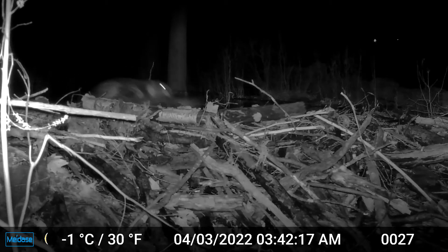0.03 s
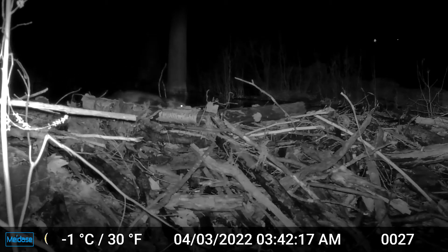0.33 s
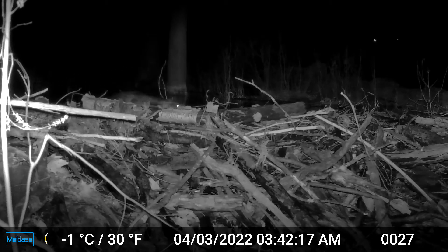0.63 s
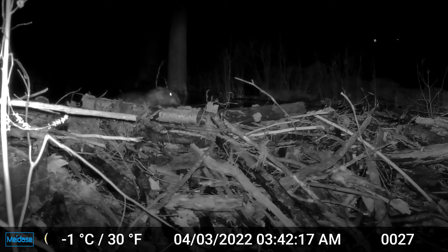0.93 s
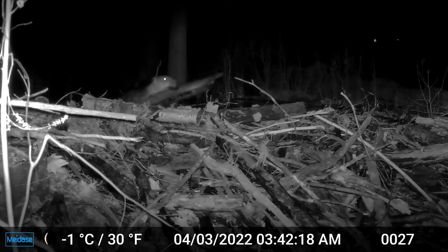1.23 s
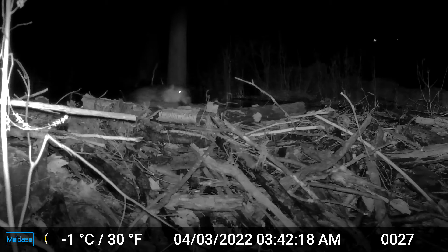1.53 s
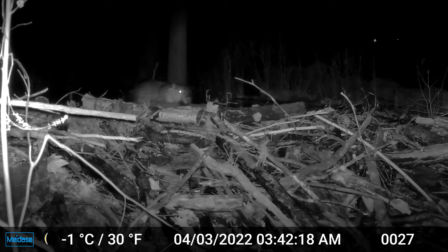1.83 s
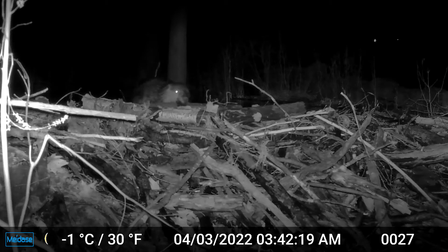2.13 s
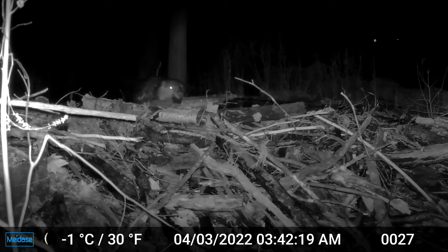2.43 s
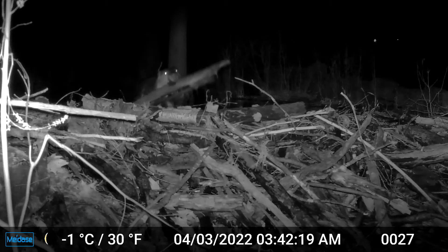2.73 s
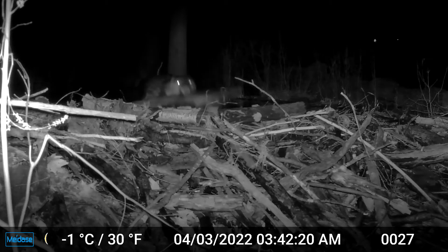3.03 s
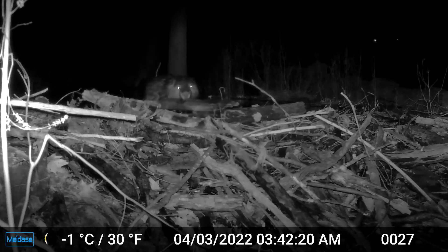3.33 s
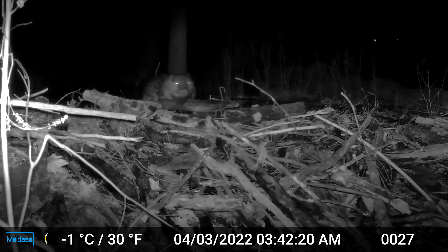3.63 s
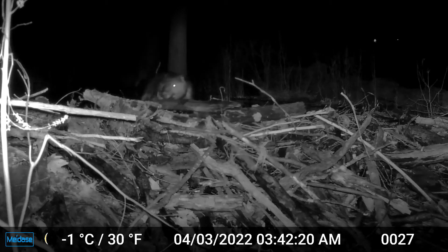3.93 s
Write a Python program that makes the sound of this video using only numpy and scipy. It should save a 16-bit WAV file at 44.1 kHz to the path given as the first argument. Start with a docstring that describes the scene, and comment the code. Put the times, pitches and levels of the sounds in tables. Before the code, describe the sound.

Close splashes and wet wooden slaps come as a beaver heaves a log at its dam. Drops plink after a loud plunge and a softer one; a soft whine and frog peeps echo farther off before the third plunge.

```python
"""A pond at night, one microphone near a beaver's dam of sticks. The beaver heaves a log over it: at 0.3 s
wet wood slaps and the log drops in with a thud and a splash. Drops plink, a frog peeps from the trees
and the water gulps shut. A softer plunge comes at 1.6 s; at 2.3 s the beaver whines once among more
peeps, both echoing in the woods. At 3.2 s the log plunges a third time and water dribbles off it.
A faint trickle, a far frog chorus and a low rumble lie under it all."""
import sys
import numpy as np
from scipy import signal
from scipy.fft import rfft, irfft, next_fast_len
from scipy.io import wavfile

SR = 44100
rng = np.random.default_rng(int(sys.argv[2]) if len(sys.argv) > 2 else 0)


def transcribe(signal):
    """Save signal, clipped to [-1, 1], as a 16-bit WAV file at the path in sys.argv[1]."""
    frames = np.atleast_2d(signal).T
    limited = np.clip(frames, -1, 1)
    pcm = np.round(limited * 32767).astype(np.int16)
    wavfile.write(sys.argv[1], SR, pcm)


N = 176400
T = np.arange(N) / SR
SHORT = T[:SR // 4]

# Wet wood slapping at the dam, close by: t/s, level/dB, ring f/Hz, tilt/(dB per octave)
WOOD_SLAPS = [(0.177, -20.5, 4740, 1.5), (0.1831, -23.5, 5100, 5.5), (0.189, -25.5, 3980, 3),
              (0.2882, -7, 4400, -3), (0.2896, -7.5, 3750, 17), (0.3016, -15, 2640, 1),
              (0.3273, -15, 1500, 0.5), (0.3675, -18, 1330, -15.5), (0.4193, -11.5, 2780, -10),
              (0.4864, -21.5, 2610, -4.5), (0.5571, -22, 4800, -6), (0.569, -22.5, 1497, -7.5),
              (1.368, -28, 4950, -4), (1.4487, -23, 3870, -9.5), (1.457, -22.5, 4570, 19),
              (1.4972, -25, 2280, 2.5), (1.5355, -26, 2640, -1.5), (1.593, -27, 5960, -4),
              (1.6036, -21, 3620, -1.5), (1.6069, -17.5, 2170, 0), (1.635, -25, 4540, 4),
              (1.6713, -20, 2940, -2.5), (1.697, -29.5, 4600, 2), (3.0959, -24.5, 4370, 5),
              (3.106, -18.5, 1940, -2), (3.2175, -27.5, 4900, 15.5), (3.235, -19.5, 4830, 7.5),
              (3.246, -14, 2590, -1.5), (3.261, -20, 4400, 7), (3.298, -11, 3090, 12),
              (3.3184, -24.5, 5430, -0.5), (3.3196, -18, 6100, 4), (3.3423, -16.5, 2890, 3),
              (3.352, -21.5, 2930, -5.5), (3.3703, -19.5, 2840, 0.5), (3.4, -21.5, 3020, -3),
              (3.455, -20, 1560, -0.5), (3.8469, -25, 2640, 0)]
# Spectrum of a slap: f/Hz, level/dB
SLAP_SPECTRUM = [(90, -27), (700, -19), (1300, 5), (2800, 3.5), (4500, 4.5), (6700, 0.5), (7800, -18),
                 (9000, -37)]
def slaps(lead_s=.01, attack_s=.001405, snap_t60=.0078, tail_t60=.075, ring_db=11):
    """Each contact swells quickly to a crackling snap with one resonance, then leaves a wet tail."""
    out = np.zeros(N)
    after = np.maximum(SHORT - lead_s, 0)
    attack = np.exp(np.minimum(SHORT - lead_s, 0) / attack_s)
    shape = attack * (fade(after, snap_t60) + from_db(-9) * fade(after, tail_t60))
    grit = rng.standard_normal(N) * from_db(3 * noise_band(350, .89))
    for s, db, hz, tilt_db in WOOD_SLAPS:
        def spectrum(f):
            tilt = tilt_db * np.log2(np.maximum(f, hz / 2) / hz)
            return curve(SLAP_SPECTRUM)(f) + tilt + ring_db * bell(f, hz, octaves=.12)
        burst = np.roll(grit, -int(s * SR))[:len(SHORT)] * shape
        crack = colour(burst, spectrum)
        crack *= np.linalg.norm(shape) / np.linalg.norm(crack)
        add(out, s - lead_s + attack_s, from_db(db - 6) * crack)
    return out


# The log's weight landing: t/s, level/dB, f/Hz
LOG_THUDS = [(0.285, -26.5, 90.4), (1.538, -35, 79), (3.238, -24, 87.5)]
# Its dull knocks: t/s, level/dB
LOG_KNOCKS = [(0.2868, -19), (0.351, -27.5), (2.223, -43), (3.107, -39), (3.216, -37.5), (3.244, -42),
              (3.821, -41.5)]
# Modes of the wet log: f/Hz, level/dB, t60/s
WET_LOG_MODES = [(254, -13, 0.11), (426, -3, 0.02), (618, 0, 0.034), (1110, -8.5, 0.072), (1277, 0, 0.036),
                 (1560, -14.5, 0.039)]
def log_blows(thud_t60=.068):
    """The log's weight lands with low thuds, and knocks ring its damped modes."""
    out = np.zeros(N)
    for s, db, hz in LOG_THUDS:
        add(out, s, from_db(db) * np.sin(2 * np.pi * hz * SHORT) * fade(SHORT, thud_t60))
    for s, db in LOG_KNOCKS:
        for k, (hz, mode_db, t60) in enumerate(WET_LOG_MODES):
            mode = np.sin(2 * np.pi * hz * SHORT) * fade(SHORT, t60)
            add(out, s, (-1) ** k * from_db(db + mode_db + rng.normal(0, .67)) * mode)
    return out


# Spray thrown up in front of the microphone: t/s, level/dB
SPRAY_LEVELS = [(0, -37.5), (.05, -40), (.08, -48.5), (.185, -47.5), (.27, -39), (.295, -36), (.335, -33),
                (.425, -34.5), (.465, -39.5), (.53, -57.5), (.62, -52.5), (.72, -76.5), (1.42, -56.5),
                (1.47, -69), (1.575, -43), (1.6, -38.5), (1.69, -36.5), (1.715, -57), (1.84, -64.5),
                (3.08, -66.5), (3.2, -52), (3.245, -34.5), (3.29, -38.5), (3.38, -41.5), (3.47, -44),
                (3.55, -55.5), (3.64, -60), (4, -75)]
# Churning under the plunging log: t/s, length/s, level/dB
LOG_PLUNGES = [(0.275, 0.12, -34), (1.6, 0.041, -44), (3.212, 0.05, -42.5), (3.318, 0.1, -51)]
# Spectra of spray and churning: f/Hz, level/dB
SPRAY_SPECTRUM = [(150, -26), (500, -4), (850, -12.5), (1350, 0.5), (2000, 2), (2800, -1.5), (4500, -0.5),
                  (5500, -5), (6600, -8.5), (7600, -23.5), (9000, -34)]
CHURN_SPECTRUM = [(60, -29.5), (110, -5.5), (170, 1.5), (300, -1), (470, 3), (750, -12.5), (1200, -0.5),
                  (2000, -21), (5000, -47)]
def splashes(attack_s=.0031, release_s=.042, clumps_hz=61):
    """Clumped spray of bursting bubbles and fine mist, with deep churning while the log plunges."""
    grains = from_db(.5) * bubbles(SPRAY_SPECTRUM, per_s=1600, spread_db=3.5, cycles=33.5)
    mist = from_db(-2.5) * noise(SPRAY_SPECTRUM)
    spray_db = np.interp(T, *np.transpose(SPRAY_LEVELS)) + noise_band(clumps_hz)
    churn = np.zeros(N)
    for s, length, db in LOG_PLUNGES:
        attack = np.clip((T - s) / attack_s, 0, 1)
        release = np.exp(-np.maximum(T - s - length, 0) / release_s)
        churn += from_db(db) * attack * release
    return (grains + mist) * from_db(spray_db) + churn * noise(CHURN_SPECTRUM)


def plink(hz, cycles=62, rise_per_s=.67, attack_s=.00081):
    """One bubble rings and rises in pitch."""
    envelope = fade(SHORT, cycles / hz) * (1 - np.exp(-SHORT / attack_s))
    return envelope * sine(hz * (1 + rise_per_s * SHORT))


# Drops on the near water: t/s, level/dB, f/Hz
POND_DROPS = [(0.2312, -21.5, 3620), (.2625, -29.5, 4300), (0.54, -29.5, 1600), (0.5724, -30.5, 1550),
              (0.6395, -28, 2116), (0.6709, -31, 1474), (0.6856, -35.5, 1300), (0.7525, -30.5, 2600),
              (1.0805, -35, 1260), (1.294, -36.5, 1735), (1.7415, -32, 1504), (1.7835, -33.5, 2150),
              (1.811, -35, 1795), (1.9866, -30, 1990), (2.0851, -38.5, 1320), (2.434, -32.5, 2720),
              (2.5739, -27.5, 2510), (2.668, -36.5, 3920), (2.8838, -35.5, 1121), (2.993, -26, 4040),
              (3.6614, -33.5, 1180), (3.71, -33, 1570), (3.723, -30, 1290), (3.7427, -24, 3030),
              (3.7947, -36.5, 1230), (3.8196, -31.5, 1167)]
def drops(splat_t60=.043, attack_s=.00081, cluster_s=.023):
    """Each drop makes a soft splat and a main bubble, then five fainter ones."""
    out = np.zeros(N)
    splat_shape = from_db(-7) * fade(SHORT, splat_t60) * (1 - np.exp(-SHORT / attack_s))
    for s, db, hz in POND_DROPS:
        splat = splat_shape * rms_one(band_pass(rng.standard_normal(len(SHORT)), hz, octaves=.45))
        add(out, s, from_db(db) * (plink(hz) + splat))
        for late, pitch in rng.random((5, 2)):
            octaves = .35 * (2 * pitch - .5)
            add(out, s + late * cluster_s, from_db(db - 17) * plink(hz * 2 ** octaves))
    return out


# Dribbles after each splash: t/s, length/s, level/dB
DRIBBLES = [(0.499, 0.23, -48.5), (1.723, .38, -48.5), (3.475, .39, -50)]
def runoff(count=50, hz=1965, octaves=.6, spread_db=7):
    """Water runs off the log in an irregular string of small bubbles."""
    out = np.zeros(N)
    for s, length, db in DRIBBLES:
        for k in range(count):
            size, pitch = np.clip(rng.standard_normal(2), -2, 2)
            start = s + length * (k + rng.random()) / count
            add(out, start, from_db(db + spread_db * size) * plink(hz * 2 ** (octaves * pitch)))
    return out


# Air pockets by the dam: t/s, length/s, start f/Hz, end f/Hz, level/dB
AIR_POCKETS = [(0.855, 0.058, 851, 1604, -43.5), (1.095, 0.053, 539, 964, -38),
               (1.121, 0.05, 894, 1500, -46.5), (1.179, 0.041, 800, 1696, -32),
               (1.697, 0.035, 482, 790, -38), (1.838, 0.061, 596, 427, -43.5),
               (1.927, 0.014, 684, 597, -44), (2.046, 0.088, 929, 1355, -47.5)]
def gulps(roughness=.28, flutter_hz=110):
    """Air pockets swell and glide in pitch as the water closes over them."""
    out = np.zeros(N)
    for s, length, start_hz, end_hz, db in AIR_POCKETS:
        progress = np.linspace(0, 1, int(length * SR))
        glide = sine(start_hz * (end_hz / start_hz) ** progress)
        add(out, s, from_db(db) * np.sin(np.pi * progress) ** 2 * glide)
    return out * (1 + roughness * noise_band(flutter_hz))


# Frogs farther off: t/s, length/s, start f/Hz, end f/Hz, level/dB
FROG_PEEPS = [(.731, 0.14, 2807, 2898, -34.5), (.984, 0.035, 2944, 2805, -40),
              (2.177, 0.17, 2744, 3064, -32), (2.305, 0.096, 3063, 3274, -28.5),
              (2.956, 0.12, 2777, 2868, -30.5)]
# Their echoes off the banks: delay/s, level/dB
BANKS = [(0.059, -7.5), (.1, -25), (.158, -10.5)]
def frogs(attack_s=.016, release_s=.0086, swell_db=1.5, waver=.003):
    """Thin whistles swell, mostly sliding upward, bounce off the banks and hang in the trees."""
    out = np.zeros(N)
    for s, length, start_hz, end_hz, db in FROG_PEEPS:
        t = T[:int(length * SR)]
        edges = np.minimum(t / attack_s, 1) * np.minimum((length - t) / release_s, 1)
        envelope = edges * from_db(db + swell_db * (t / length - 1.5))
        hz = start_hz + (end_hz - start_hz) * (t / length) ** .8
        hz *= 1 + waver * noise_band(33)[:len(t)]
        add(out, s, envelope * (sine(hz) + from_db(-33.5) * sine(1.5 * hz)))
    echoes = sum(from_db(db) * np.interp(T - delay, T, out, left=0) for delay, db in BANKS)
    return woods(out, wet_db=-10) + echoes


# The beaver's call, ringing among the trees: t/s, f/Hz, level/dB
WHINE_CONTOUR = [(2.301, 408, -61), (2.341, 421.4, -48.5), (2.43, 436.4, -38.5), (2.533, 474, -46.5),
                 (2.584, 448.2, -45.5), (2.66, 411, -58)]
# Its harmonics, from the fundamental up: level/dB
WHINE_HARMONICS = [-3, -8, -7, -10, -12.5, -23, -4.5]
def whine(edge_s=.012, jitter=.004, roughness=.2, shimmer_hz=35):
    """One soft, slightly hoarse nasal call that arches in pitch."""
    s, hz, db = np.transpose(WHINE_CONTOUR)
    pitch = np.interp(T, s, hz) * (1 + jitter * noise_band(shimmer_hz))
    edges = np.clip(np.minimum(T - s[0], s[-1] - T) / edge_s, 0, 1)
    voice = sum(from_db(level) * sine(k * pitch) * (1 + roughness * noise_band(shimmer_hz))
                for k, level in enumerate(WHINE_HARMONICS, 1))
    return woods(from_db(np.interp(T, s, db)) * edges * voice, wet_db=-3)


# Edges of the band that the trunks throw back: f/Hz
TRUNK_BAND = [900, 6000]
def woods(x, wet_db, t60=.72, build_s=.0023):
    """Sound reaches the microphone directly, then scattered by the trunks around the pond."""
    t = T[:SR * 3 // 2]
    echoes = rng.standard_normal(len(t)) * fade(t, t60) * (1 - np.exp(-t / build_s))
    echoes = signal.sosfilt(signal.butter(1, TRUNK_BAND, "band", fs=SR, output="sos"), echoes)
    return x + from_db(wet_db) * signal.fftconvolve(x, echoes / np.linalg.norm(echoes))[:N]


# Still air over the pond: f/Hz, level/dB
AIR_SPECTRUM = [(25, 2), (80, 7), (290, -9), (700, -15), (1050, -36.5), (1260, -24.5), (1730, -41),
                (2560, -20.5), (2900, -18), (3400, -32), (4200, -25), (6500, -23.5), (7600, -29),
                (9000, -54)]
def night(surge_at_s=2.18, surge_width_s=.23):
    """Still air, a wavering low rumble that surges once, and a far frog chorus."""
    air = from_db(-57) * noise(AIR_SPECTRUM)
    surge_db = 8.5 * np.exp(-((T - surge_at_s) / surge_width_s) ** 2)
    rumble = noise_band(62.5, octaves=.78) * from_db(-57 + surge_db + 2 * noise_band(4))
    chorus = from_db(-65) * noise_band(2922, octaves=.096)
    return air + rumble + chorus


# Water among the sticks, faint at the microphone: f/Hz, level/dB
TRICKLE_SPECTRUM = [(400, -19.5), (1200, 8.5), (2200, 5), (4000, 8.5), (7000, -15.5), (9000, -47)]
def trickle():
    """Tiny bubbles ring as water seeps through the dam."""
    return from_db(-63.5) * bubbles(TRICKLE_SPECTRUM, per_s=500, spread_db=2.5, cycles=150)


def bubbles(spectrum, per_s, spread_db, cycles):
    """Random tiny bubbles of all sizes, each ringing for some cycles; rms 1."""
    sizes = from_db(spread_db * np.minimum(rng.exponential(1, N), 4))
    kicks = sizes * rng.choice([-1, 1], N) * (rng.random(N) < per_s / SR)
    pitches = np.geomspace(600, 7500, 48)
    pitch_index = rng.integers(0, len(pitches), N)
    out = np.zeros(N)
    for k, hz in enumerate(pitches):
        r, w = fade(1 / SR, cycles / hz), 2 * np.pi * hz / SR
        resonator = [0, np.sin(w)], [1, -2 * r * np.cos(w), r * r]
        out += w * signal.lfilter(*resonator, kicks * (pitch_index == k) + 1e-18)
    slope = np.diff(out, prepend=0)
    return rms_one(colour(slope, lambda f: curve(spectrum)(f) - 20 * np.log10(np.maximum(f, pitches[0]))))


def from_db(db):
    return 10 ** (np.asarray(db) / 20)


def rms_one(x):
    return x / np.sqrt(np.mean(x ** 2) + 1e-20)


def sine(hz):
    return np.sin(2 * np.pi * np.cumsum(hz) / SR)


def fade(t, t60):
    """Exponential decay, 60 dB down after t60."""
    return np.exp(-np.log(1000) * t / t60)


def add(out, s, sound):
    """Mix a sound in at its start time."""
    i = max(int(s * SR), 0)
    out[i:i + len(sound)] += sound[:max(N - i, 0)]


def curve(points):
    """Spectrum points as a function from Hz to dB."""
    hz, db = np.transpose(points)
    return lambda f: np.interp(np.log(f), np.log(hz), db)


def bell(f, hz, octaves):
    """A hump of height 1 on the log-frequency axis."""
    return np.exp(-.5 * (np.log2(f / hz) / octaves) ** 2)


def colour(x, db_at):
    """Causal (minimum-phase) filter with a given dB response."""
    size = 2 * next_fast_len(len(x) // 2 + 4096)
    f = np.maximum(np.fft.rfftfreq(size, 1 / SR), 1)
    cepstrum = irfft(np.log(from_db(db_at(f))))
    cepstrum[1:size // 2] *= 2
    cepstrum[size // 2 + 1:] = 0
    return irfft(rfft(x, size) * np.exp(rfft(cepstrum)))[:len(x)]


def band_pass(x, hz, octaves):
    """Keep one smooth band of a sound."""
    return irfft(rfft(x) * bell(np.fft.rfftfreq(len(x), 1 / SR) + 1, hz, octaves), len(x))


def noise(spectrum):
    """Coloured noise, rms 1."""
    return rms_one(colour(rng.standard_normal(N), curve(spectrum)))


def noise_band(hz, octaves=1):
    """One smooth band of noise, rms 1."""
    return rms_one(band_pass(rng.standard_normal(N), hz, octaves))


def scene():
    """From one spot, in mono: the dam close and almost dry, the calls echoing, the night behind."""
    dam = splashes() + log_blows() + slaps() + drops() + runoff() + gulps()
    return (woods(dam, wet_db=-24.5) + frogs() + whine() + night() + trickle())[None]


def record(dry, stop_hz=9700):
    """The top is cut steeply."""
    return signal.sosfilt(signal.cheby2(16, 70, stop_hz, fs=SR, output="sos"), dry)


dry = scene()
out = record(dry)
transcribe(out)
```